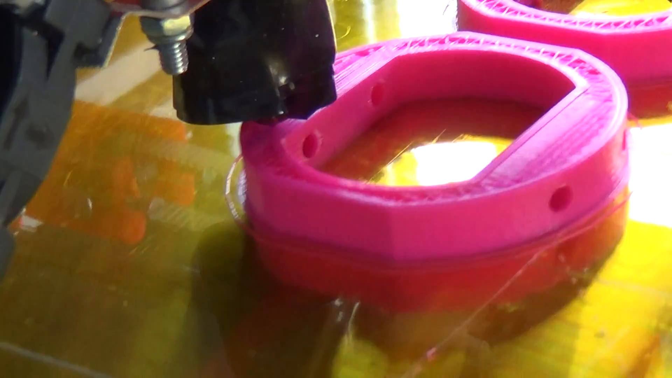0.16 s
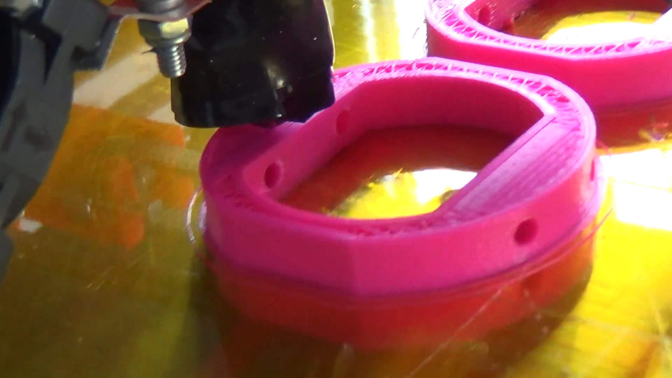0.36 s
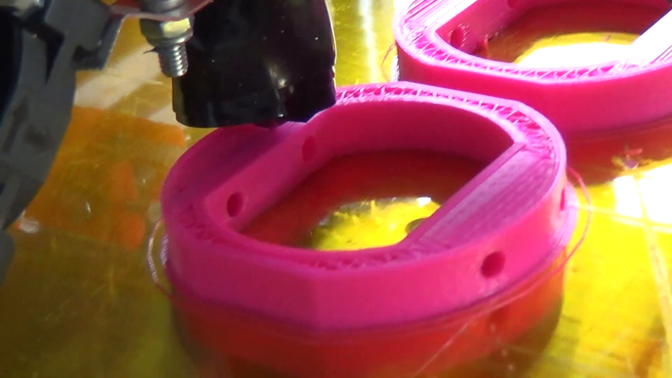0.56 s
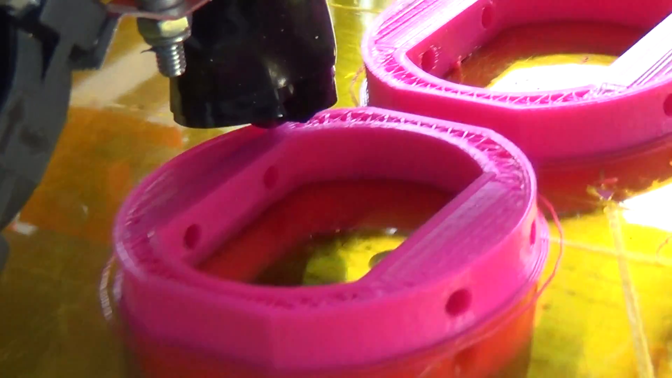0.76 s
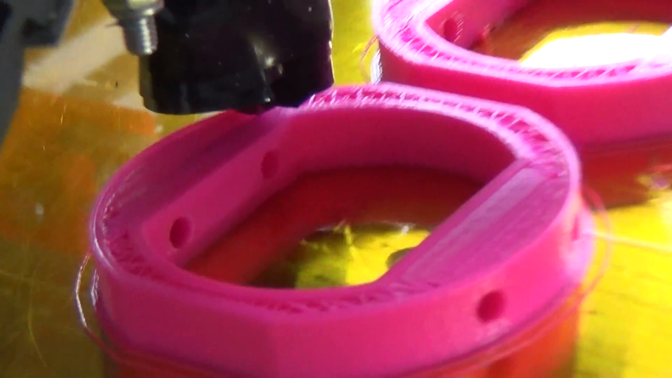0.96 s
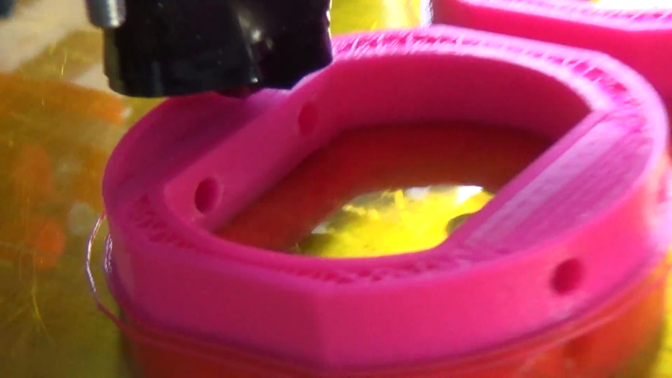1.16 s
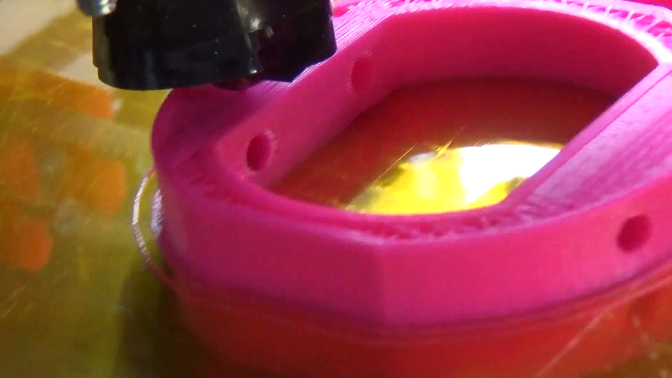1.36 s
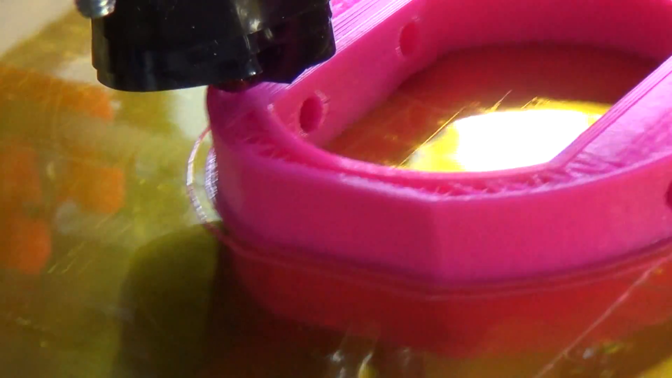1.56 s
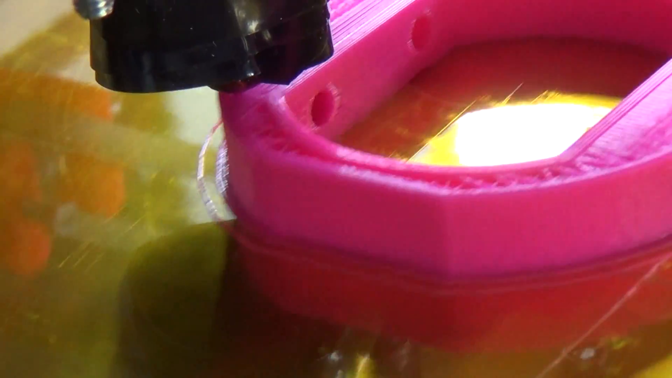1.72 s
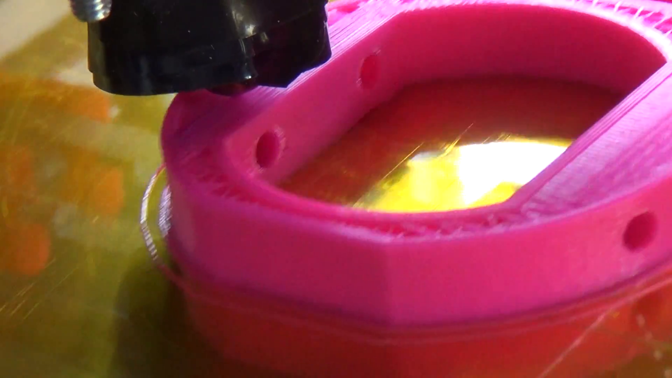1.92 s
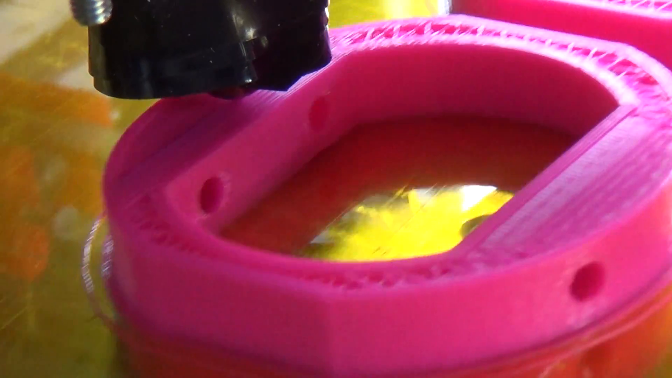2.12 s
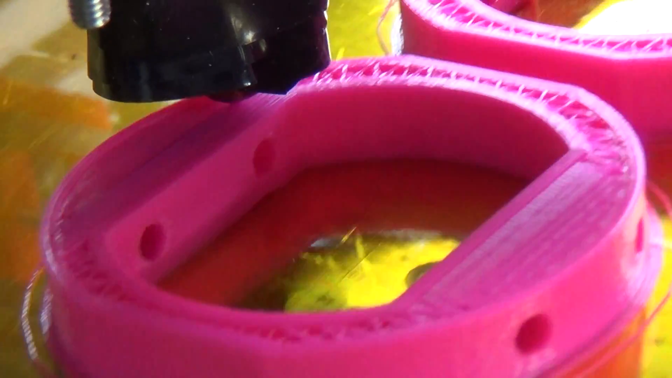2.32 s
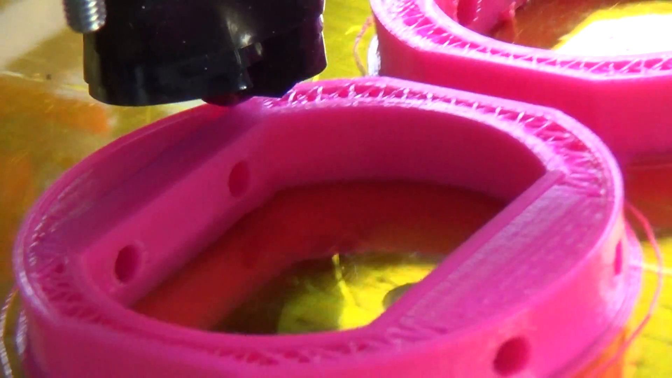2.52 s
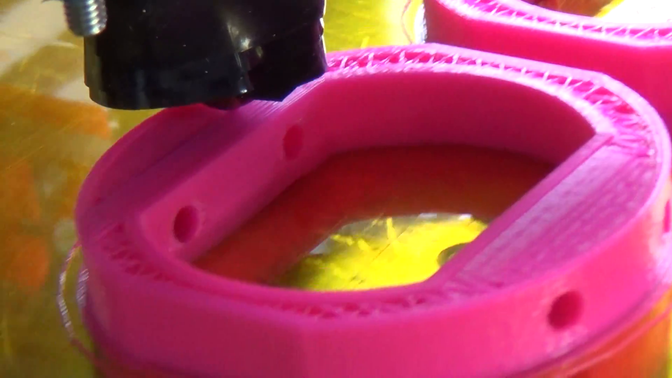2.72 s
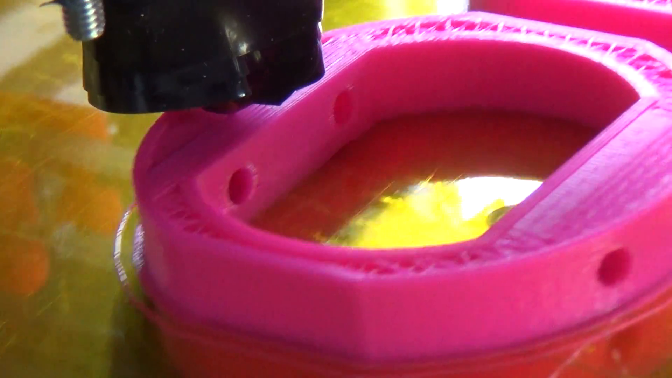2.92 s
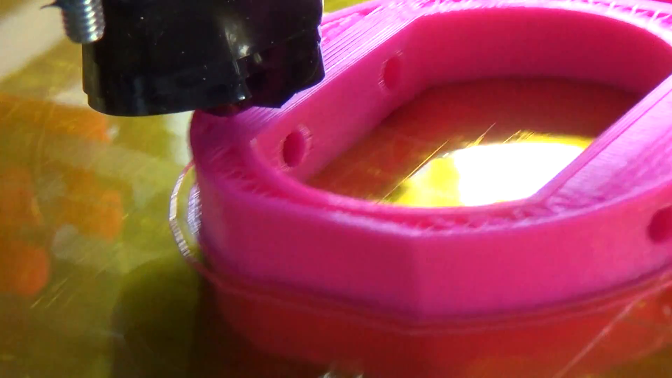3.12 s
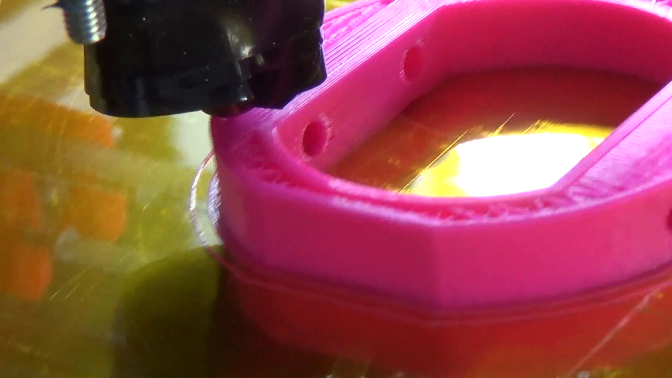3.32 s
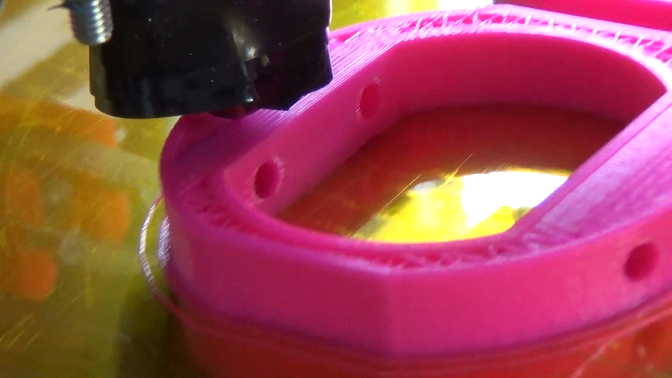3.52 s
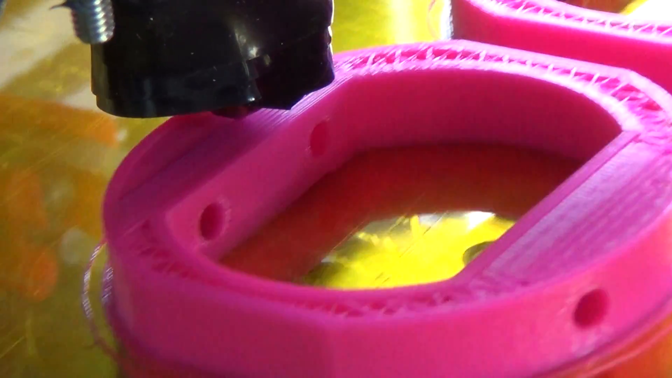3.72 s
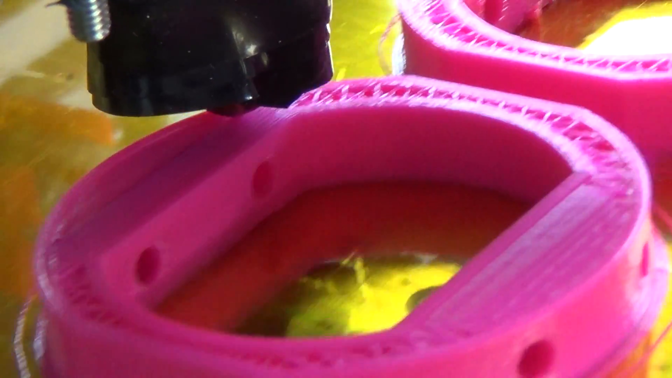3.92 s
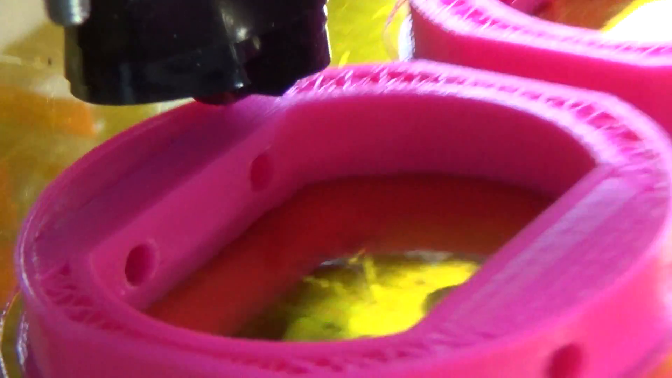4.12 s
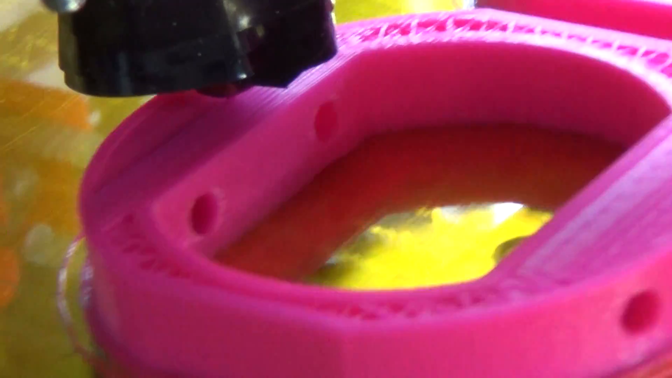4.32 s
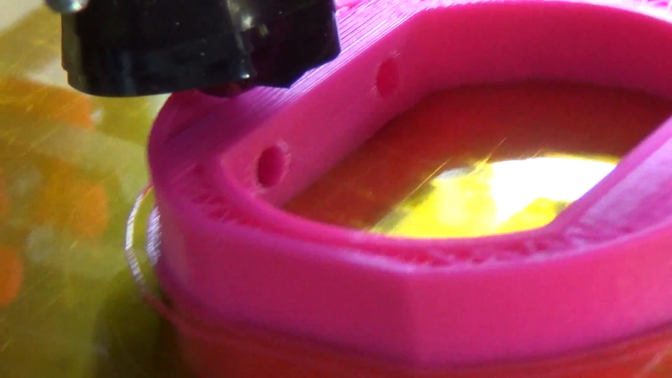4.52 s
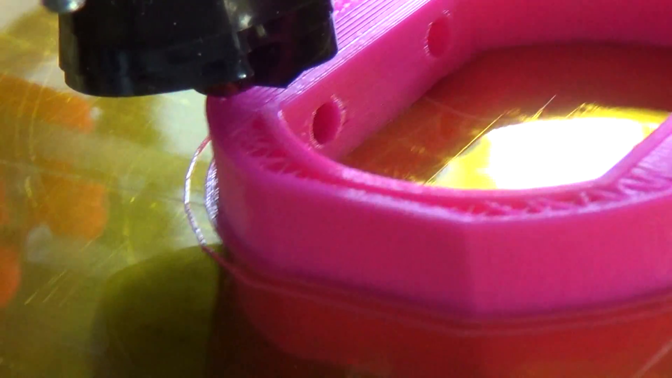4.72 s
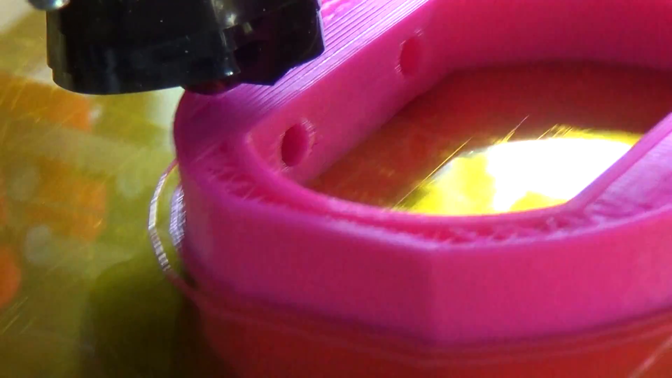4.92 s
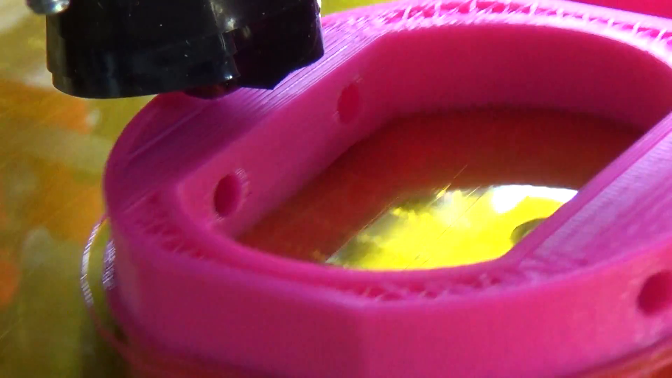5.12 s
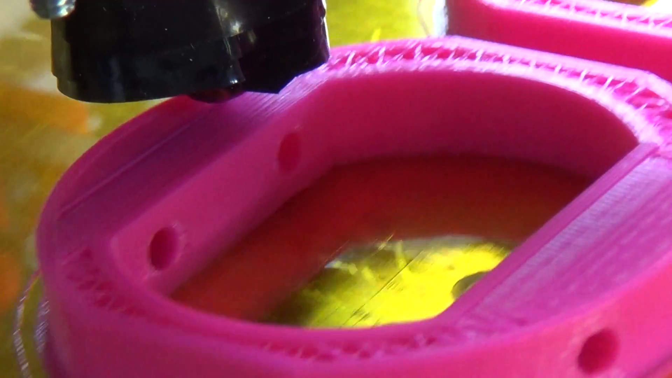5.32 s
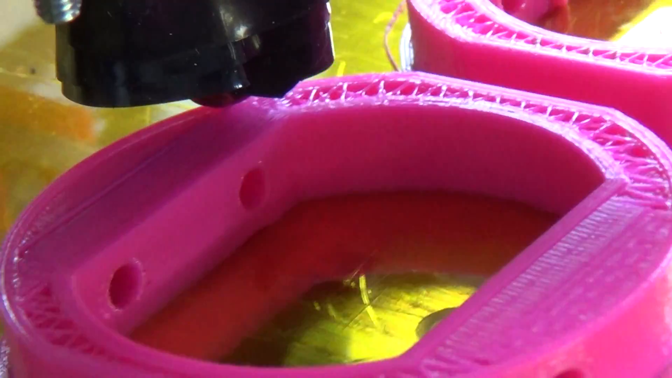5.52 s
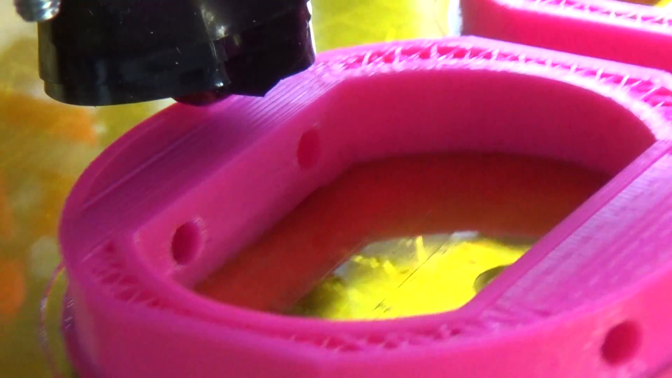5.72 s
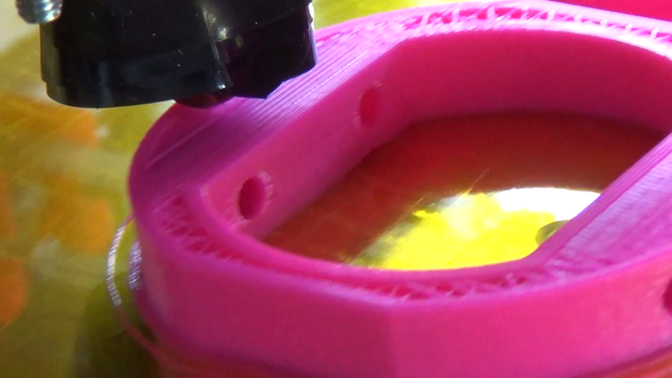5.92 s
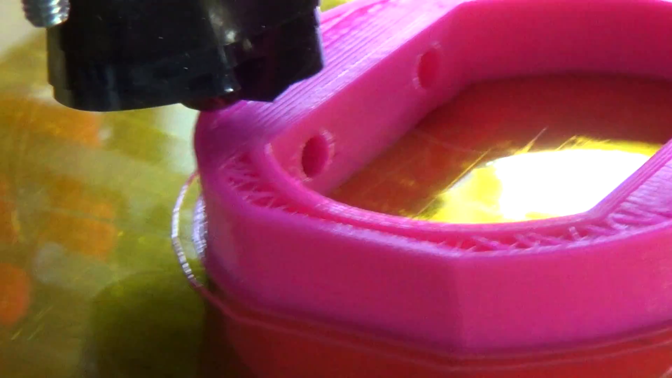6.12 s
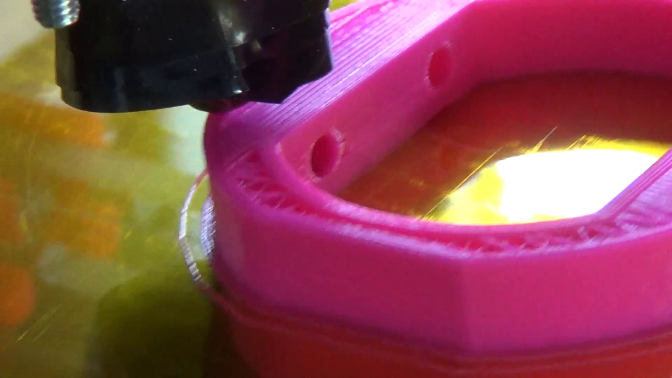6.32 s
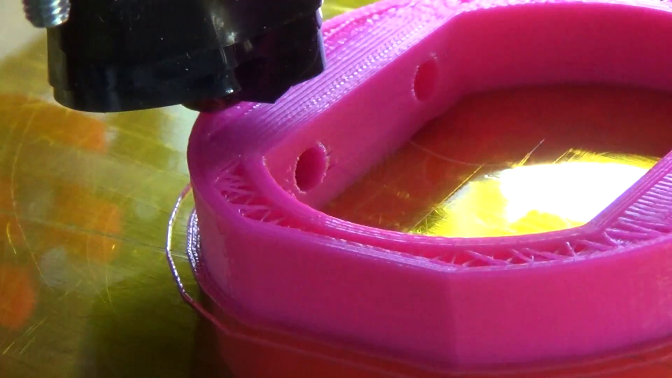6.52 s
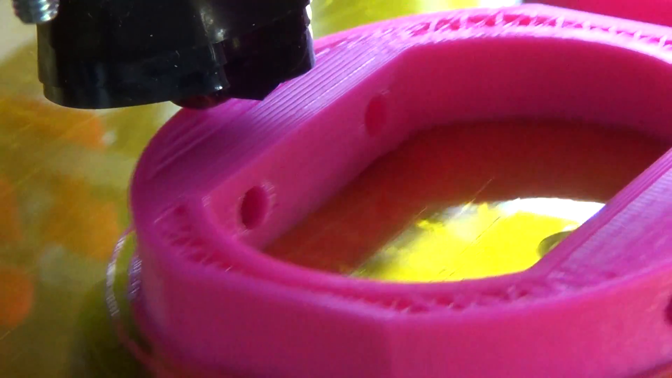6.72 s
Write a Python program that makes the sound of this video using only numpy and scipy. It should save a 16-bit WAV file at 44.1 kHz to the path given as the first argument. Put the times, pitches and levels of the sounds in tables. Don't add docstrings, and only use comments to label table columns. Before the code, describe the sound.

Very close to a desktop 3D printer in a small room. The bed motor holds a clear, high-mid whine for about two thirds of a second, brakes with a rattling shudder and low thump, then whines again at the same pitch. A small fan hisses, hums and ticks rapidly throughout. Occasional plastic snaps and carriage clacks; near the end, short fast jogs make it rougher.

```python
import sys
import numpy as np
from scipy import signal
from scipy.io import wavfile
from scipy.ndimage import uniform_filter1d

SR = 44100
rng = np.random.default_rng(int(sys.argv[2]) if len(sys.argv) > 2 else 0)


def master(y):
    cut = np.clip(np.atleast_2d(y).T, -1, 1)
    pcm = np.round(cut * 32767)
    wavfile.write(sys.argv[1], SR, pcm.astype(np.int16))


def nominal_scale(level):
    x = np.asarray(level, float) / 20
    return 10 ** x


N = 297675


def evened(x):
    return x / np.sqrt(np.mean(x ** 2) + 1e-20)


def read(points, hz):
    f, value = np.transpose(points)
    return np.interp(np.log(hz + 1), np.log(f + 1), value)


def add(mix, s, sound):
    part = mix[..., round(s * SR):][..., :sound.shape[-1]]
    part += sound[..., :part.shape[-1]]


def drift(n, span):
    smooth = uniform_filter1d(rng.standard_normal(n), span)
    return evened(uniform_filter1d(smooth, span))


def ring(x, hz, width):
    return signal.lfilter(*signal.iirpeak(hz, hz / width, SR), x)


def tone(hz, db):
    turns = np.cumsum(hz) / SR + rng.random()
    return np.sqrt(2) * nominal_scale(db) * np.cos(2 * np.pi * turns)


def placed(x, lean_db):
    return x * np.array([nominal_scale(lean_db / 2), nominal_scale(-lean_db / 2)]).reshape(2, -1)


# [start t/s, end t/s, whine level/dB, low hum level/dB, belt tone level/dB]
STROKES = [
    (.125, 0.819, -28.5, -38, -39),
    (.972, 1.642, -28.5, -37, -39.5),
    (1.788, 2.452, -29, -37.5, -40.5),
    (2.599, 3.231, -29, -37.5, -41.5),
    (3.377, 4.007, -29, -37, -43),
    (4.153, 4.743, -29, -37, -44),
    (4.919, 5.476, -30, -41, -43),
    (5.698, 6.14, -29.5, -36.5, -59),
    (6.674, 7.297, -28.5, -38, -58),
]
STEP_HZ = 1456.1
LOUD_ORDERS = (32, 6, 25, 18)
FAINT_ORDERS = (7, 10, 11, 14, 20, 28, 33, 36, 39, 40, 43, 44, 46, 49, 52, 57, 63, 64, 70, 78, 89, 96, 153,
                160, 190, 192, 256)
FAINT_DB = [-57, -56, -55, -56, -57, -59, -55, -51, -58, -55, -58, -58, -57, -60, -62, -60, -61, -61, -63,
            -62, -65, -65, -70, -66, -70, -65, -73]
# [share of the way to the far end, level/dB, left-right/dB]
AWAY = [(0, -0.5, -1), (.07, 1.5, 1), (.2, -2.5, 2), (.46, 1.5, 1), (.7, -2, 2.7), (.88, -8, 4.5),
        (1, -12, 10)]
BACK = [(0, 1, 1.5), (.2, 1, 1), (.36, -0.5, 2.5), (.5, 2, 2), (.79, -5, 4.5), (.92, -3, 5), (1, -6, -6)]
# [t/s, level/dB, width/s]
HICCUPS = [
    (5.128, -11, .015),
    (5.18, -3.5, .08),
]
HUM_LATE_DB, HUM_BUILD_S = -8.5, 0.063
PULLEY_DB, PULLEY_WANDER_DB = -44.5, 2


def stroke(place, start, end, whine_db, hum_db, belt_db):
    t = np.arange(0, end - start, 1 / SR)
    n = len(t)
    way = t / t[-1] if place is AWAY else 1 - t / t[-1]
    share, gain_db, lean_db = np.transpose(place)
    falter_db = sum(db * np.exp(-((start + t - s) / width) ** 2) for s, db, width in HICCUPS)
    loud_db = (whine_db + np.interp(way, share, gain_db) + falter_db,
               hum_db + HUM_LATE_DB * np.exp(-t / HUM_BUILD_S) + 1.0 * drift(n, 2000),
               belt_db + 1.0 * drift(n, 1500),
               PULLEY_DB + 0.19 * (belt_db - STROKES[2][-1]) + PULLEY_WANDER_DB * drift(n, 2000))
    base = STEP_HZ / 32 * np.ones(n)
    whine, hum, belt, pulley = (tone(k * base, db + 0.16 * drift(n, 300))
                                for k, db in zip(LOUD_ORDERS, loud_db))
    faint = sum(tone(k * base, db + 1.5 * drift(n, 1500)) for k, db in zip(FAINT_ORDERS, FAINT_DB))
    sound = placed(whine, np.interp(way, share, lean_db))
    sound = sound + placed(belt + pulley + faint, 0.14) + placed(hum, 2.5)
    fade = np.minimum(1, np.minimum(t, t[-1] - t) / .005)
    return start, sound * fade


# [t/s, step rate f/Hz]
JOGS = [(5.47, 1456), (5.54, 380), (5.545, 300), (5.615, 1292), (5.69, 1292), (5.7, 1456), (6.138, 1456),
        (6.205, 215), (6.22, 200), (6.243, 300), (6.272, 4064), (6.306, 4064), (6.335, 300), (6.39, 550),
        (6.456, 200), (6.496, 4064), (6.53, 4064), (6.572, 200), (6.655, 1456)]
BRAKE_S, REST_HZ = .062, 380
DWELL_S, CRAWL_HZ, SETTLE_S = .008, 300, .003


def speed(t):
    ends = [-.025] + [row[1] for row in STROKES[:6]]
    starts = [row[0] for row in STROKES[:7]]
    points = []
    for end, start in zip(ends, starts):
        slow = end + BRAKE_S
        points += [(end, STEP_HZ), (slow, REST_HZ), (slow + DWELL_S, CRAWL_HZ), (start - SETTLE_S, STEP_HZ)]
    return np.interp(t, *np.transpose(points + JOGS))


# [t/s, hold/s, thump level/dB, middle shudder level/dB]
KNOCKS = [(0, .005, -31.5, -52), (0.052, 0.025, -32.5, -35.5), (0.892, 0.016, -31.5, -32.5),
          (1.712, 0.032, -35, -34.5), (2.522, 0.035, -30.5, -34.5), (3.312, 0.022, -31.5, -34.5),
          (4.073, 0.031, -33.5, -33), (4.82, .006, -35, -35), (4.847, 0.037, -27, -34.5),
          (5.552, .02, -33, -33.5), (5.573, 0.089, -31.5, -35), (6.16, .05, -36, -34),
          (6.214, 0.0051, -28, -32), (6.336, 0.077, -39.5, -31), (6.449, 0.012, -30, -39),
          (6.59, 0.0078, -30, -38), (6.608, 0.058, -35, -37)]


def knocks(t, column, rest_db, rise, fall):
    s, hold, peak_db = (np.transpose(KNOCKS)[k][:, None] for k in (0, 1, column))
    before, after = np.maximum(s - t, 0), np.maximum(t - s - hold, 0)
    return np.maximum(rest_db, (peak_db - rise * before - fall * after).max(0))


# [start t/s, end t/s, high shudder level/dB, rattle relative to the steps]
SHUDDERS = [(0, 0.132, -36, 3), (.805, 0.974, -34, 3), (1.635, 1.792, -35.5, 2.4), (2.435, 2.601, -35, 3.6),
            (3.224, 3.374, -36.5, 2.7), (3.999, 4.16, -34, 3), (4.735, 4.831, -35.5, 1.6),
            (4.825, 4.952, -36, 6.4), (5.465, 5.554, -33.5, 4), (5.545, 5.709, -35, 6.3),
            (6.136, 6.264, -35.5, 7.3), (6.249, 6.33, -59, 2.4), (6.3326, 6.47, -36, 9.4),
            (6.475, 6.583, -61, 2.3), (6.571, 6.691, -34.5, 5)]
# [f/Hz, width/Hz, level/dB]
FRAME = [(147.4, 5.4, -16), (212.6, 34.5, -5), (343, 44, -3), (448, 45, -1), (554.5, 17.3, 7.5),
         (791, 120, 3.5), (1044, 103, 7), (1398, 230, 5), (1570, 70, 6), (1916, 72, 6), (2190, 40, -15),
         (2700, 250, -8.5), (3170, 340, -11)]
SPLIT_HZ = (0, 300, 680, 5000)
# [level between knocks/dB, rise/dB per s, fall/dB per s]
THUMP = (-43.5, 460, 790)
MIDDLE = (-54, 460, 210)
STEP_ORDERS = (25 / 32, 1, 57 / 32, 2, 3, 4, 5, 6, 8, 10)
STEP_DB = [-12, 0, -7, -4, -8, -9, -10, -11, -12, -13]
STEP_TOP_HZ = 2300
STAIR_S = .0085
JOLT_DB, JOLT_S = 3, 0.0092
LOOSE_BRAKING, LOOSE_CLIMBING = .36, .56
MIDDLE_LATE_S, BRAKING_DB = 0.012, 0.5


def shudder(start, end, high_db, slack):
    t = np.arange(start, end, 1 / SR)
    n = len(t)
    ramp = np.gradient(speed(t))
    since = t - np.transpose(KNOCKS)[0][:, None]
    jolt = (np.exp(-abs(since) / JOLT_S) * (since > 0)).max(0)
    braking = uniform_filter1d(1. * (ramp < 0), size=400)
    levels_db = (knocks(t, 2, *THUMP),
                 knocks(t - MIDDLE_LATE_S, 3, *MIDDLE),
                 high_db + JOLT_DB * jolt + BRAKING_DB * braking)

    hz = speed((t // STAIR_S + .5) * STAIR_S)
    turns = np.cumsum(hz * (1 + 0.01476 * drift(n, 60))) / SR
    steps = sum(nominal_scale(db) * np.cos(2 * np.pi * k * turns) / (1 + (k * hz / STEP_TOP_HZ) ** 10)
                for k, db in zip(STEP_ORDERS, STEP_DB))
    steps *= nominal_scale(2.0 * drift(n, 150))
    steps *= uniform_filter1d(1. * (ramp != 0), size=200)

    rattle = rng.standard_normal(n) * nominal_scale(3.0 * drift(n, 70))
    rattle *= .4 + np.exp(-(turns % 1) / .3)
    loose = slack * np.where(ramp < 0, LOOSE_BRAKING, LOOSE_CLIMBING)
    drive = evened(steps) + loose * evened(rattle)
    drive = signal.sosfilt(signal.butter(4, (125, 3700), "band", fs=SR, output="sos"), drive)

    out = np.zeros(n)
    for level_db, lo, hi in zip(levels_db, SPLIT_HZ, SPLIT_HZ[1:]):
        body = sum(nominal_scale(db) * ring(drive, f, w) for f, w, db in FRAME if lo < f < hi)
        loudness = np.sqrt(uniform_filter1d(body ** 2, size=1500) + 1e-9)
        out += nominal_scale(level_db) * body / loudness
    return start, placed(out * signal.windows.tukey(n, 0.011 / (end - start)), 0.13)


# [start t/s, end t/s]
SWEEPS = [
    (6.243, 6.274),
    (6.458, 6.498),
    (6.528, 6.572),
]
JOG_DB = -46


def sweep(start, end):
    t = np.arange(start, end, 1 / SR)
    glide = tone(speed(t), JOG_DB + 2.2 * drift(len(t), 100))
    return start, placed(glide * signal.windows.tukey(len(t), .3), .4)


# [t/s, peak level/dB, bright ring f/Hz]
CLACKS = [
    (.912, -27, 7000),
    (1.722, -24.5, 3340),
    (2.527, -30, 3380),
    (3.32, -34, 3300),
    (4.091, -28, 3000),
    (6.26, -25, 6800),
    (6.335, -20.5, 6500),
]


def clack(s, db, hz):
    t = np.arange(1300) / SR
    blow = rng.standard_normal(len(t)) * nominal_scale(-60 * t / 0.053)
    bright = evened(ring(ring(blow, hz, 700), hz, 900))
    x = evened(ring(blow, 1000, 850)) + nominal_scale(-7 - 60 * t / 0.038) * bright
    return s, placed(nominal_scale(db) * x / abs(x).max(), .6)


# [start t/s, end t/s, tones as (f/Hz,
# level/dB)]
MOVES = [(4.93, 5.52, [(52, -63), (155, -50.5), (206, -40.5), (256.8, -41.5), (316, -50.5), (105, -59),
         (359, -54), (453, -53.5), (515, -57), (570, -46), (1350, -49), (1550, -48)]),
         (5.573, 5.815, [(132, -51.5)]), (4.888, 4.935, [(565, -33.5)]), (6.625, 6.68, [(345, -38),
         (447, -37.5), (705, -41)]), (6.304, 6.325, [(506, -37)]), (6.167, 6.181, [(1095, -31),
         (1600, -37)]), (6.388, 6.402, [(1620, -33), (1100, -39)]), (6.426, 6.456, [(560, -33)]),
         (6.153, 6.181, [(555, -37)]), (6.187, 6.2, [(410, -35)]), (6.405, 6.436, [(1620, -41)]),
         (6.312, 6.33, [(2850, -43), (500, -44)]), (5.618, 5.664, [(1292, -28.5)]),
         (5.664, 5.695, [(1306, -35)]), (5.622, 5.682, [(1927, -54), (2056, -48), (2650, -48),
         (3252, -44.5)]), (6.272, 6.305, [(506.0, -37.5), (1523, -56), (2051, -63), (3558, -47),
         (4064, -41), (6449, -62), (8134, -49)]), (6.496, 6.53, [(511.4, -47), (1109, -57), (1529, -53),
         (2536, -53), (3052, -61), (3558, -55), (4064, -41), (8134, -49)])]


def move(start, end, tones):
    n = round((end - start) * SR)
    sound = sum(tone(hz * np.ones(n), db + 1.0 * drift(n, 400)) for hz, db in tones)
    fade = np.minimum(1, np.minimum(np.arange(n), n - np.arange(n)) / 160)
    return start, placed(sound * fade, 3.1)


# [t/s, peak level/dB, left-right/dB, brightness/dB per octave]
SNAPS = [(0.7856, -36, 0.0, -3), (0.991, -23.5, 2, -1.5), (1.0221, -36, 0.0, 2), (1.0953, -24, 2, -2),
         (1.406, -30, 1.1, -8), (1.51, -28, 2, -8), (3.352, -27.5, 0.4, .1), (4.1976, -28, 2, -1),
         (4.9228, -23, 1.5, .1), (5.162, -31, 0.4, -4), (5.606, -18.5, 2, -1), (5.636, -23, 2, -1),
         (5.7092, -23, 2, -1.5), (6.1688, -23.5, 2, -2), (6.271, -30.5, -1.1, -6), (6.3044, -36, 0.0, .1),
         (6.32, -36, 1.1, .1), (6.526, -32, 1.1, -1), (6.5858, -38, 0.0, .1), (6.614, -28, 3, -2)]
# [f/Hz, level/dB, time to fall 60 dB/s]
SNAP_MODES = [(4320, 3, 0.0096), (5260, 2.5, 0.0073), (6180, 4, 0.0046), (7500, 1.5, 0.0043),
              (9080, -5, 0.0036), (10500, 1, 0.003)]


def snap(s, db, lean_db, tilt_db):
    t = np.arange(1200) / SR
    x = np.zeros(len(t))
    for f, mode_db, t60 in SNAP_MODES:
        more_db, detune = rng.uniform(-1, 1, 2) * (2.0, .012)
        level_db = mode_db + more_db + tilt_db * np.log2(f / 5e3) - 60 * t / t60
        rise = (1 - np.exp(-t / 0.00056 * (f / 4400) ** 2)) ** 2
        x += nominal_scale(level_db) * np.sin(2 * np.pi * f * (1 + detune) * t) * rise
    puff = ring(ring(rng.standard_normal(len(t)), 6000, 4300), 6700, 6000)
    x += puff * nominal_scale(8 + tilt_db - 60 * t / 0.0043) * (1 - np.exp(-t / .00008))
    return s + .0015, placed(nominal_scale(db + 5.5) * x / abs(x).max(), lean_db)


# [f/Hz, level/dB, waver/Hz]
HUMS = [(80, -61.5, 1.5), (545, -51, 0.3), (1085.6, -47, 1)]
# [t/s, f/Hz, level/dB]
SECOND_FAN = [(0, 1092, -53), (4.5, 1094, -53), (5, 1098, -47), (6.75, 1104, -46)]
# [f/Hz, level/dB]
WHISTLE = (15625, -68)
# [t/s, peak level/dB]
HARD_TICKS = [(0.0237, -31), (0.1859, -29), (0.335, -29), (0.468, -25.5), (0.6309, -31), (0.9115, -26),
              (0.9719, -33), (1.0012, -23.5), (1.061, -32), (1.222, -30), (1.2529, -32), (1.3108, -31),
              (1.326, -26), (1.4455, -31), (1.4604, -32), (1.49, -30), (1.5183, -30), (1.8007, -32),
              (1.9045, -32), (2.098, -26), (2.2771, -34), (2.321, -31), (2.4103, -28), (2.4702, -32),
              (2.617, -34), (2.6332, -27), (2.7207, -28), (2.7675, -32), (2.8408, -30), (2.8718, -32),
              (2.9755, -35), (2.9905, -25.5), (3.1232, -32), (3.198, -32), (3.227, -32), (3.3163, -31),
              (3.7622, -32), (3.8356, -30), (4.029, -26), (4.118, -30), (4.2367, -31), (4.325, -27.5),
              (4.3995, -25.5), (4.4587, -30), (4.7103, -29), (4.874, -26), (4.9446, -29), (5.1406, -31),
              (5.3332, -32), (5.377, -28), (5.467, -26), (5.6032, -30), (5.6286, -28), (5.823, -30),
              (5.986, -28), (6.3115, -27), (6.5339, -28.5), (6.6227, -30)]
FAN_HZ, TICK_DB = 67.55, -36


def fan():
    tones = sum(tone(hz + waver * drift(N, 4000), db + 2.6 * drift(N, 2000)) for hz, db, waver in HUMS)
    s, hz, db = np.transpose(SECOND_FAN)
    t = np.arange(N) / SR
    tones += tone(np.interp(t, s, hz) + 1.007 * drift(N, 4000), np.interp(t, s, db))
    tones += tone(WHISTLE[0] * np.ones(N), WHISTLE[1])

    count = int(N / SR * FAN_HZ * 2) - 2
    late, strength = rng.standard_normal((2, count))
    at = (np.arange(count) / 2 + .72) / FAN_HZ + .0007 * late
    db = TICK_DB + 4.0 * np.minimum(strength, .9) - 10.0 * (np.arange(count) % 2)
    hard_at, hard_db = np.transpose(HARD_TICKS)
    at, db = np.r_[at, hard_at + .0006], np.r_[db, hard_db + 1.5]

    ticks, u = np.zeros(N), np.arange(260) / SR
    edge = np.sin(2 * np.pi * 12600 * u) * np.exp(-u / 0.00026)
    for s, level_db, (a, b) in zip(at, db, rng.random((len(at), 2))):
        rise = .00018 + .0002 * a
        chirp = np.sin(2 * np.pi * (9200 + 700 * b + 240000.0 * u) * u)
        add(ticks, s + .0005, nominal_scale(level_db - 11) * edge)
        add(ticks, s + .0005, nominal_scale(level_db) * chirp * (u / rise) * np.exp(1 - u / rise))
    ticks += nominal_scale(-11) * np.roll(ticks, shift=100)
    return placed(tones + ticks, 0.45)


# [f/Hz, level/dB per Hz]
AIR = [(25, -30), (60, -5), (120, -12), (200, -2.5), (310, -3), (400, -8), (700, -0.5), (1100, -0.5),
       (2000, -2.5), (2500, -9.5), (4800, -17), (8000, -15), (12500, -18.5), (15700, -26)]
AIR_DB = -36.5
# [f/Hz, width/Hz, level/dB]
AIR_PEAKS = [(248, 97, 10.5), (460, 54, 8.5), (1492, 43, 10), (2859, 46, 14.5), (3780, 32, 5.5),
             (3950, 1350, 6), (9900, 540, 3)]
# [f/Hz, likeness]
SAME = [(60, 0.52), (130, 0.99), (290, 0.9), (640, 0.46), (1410, 0.68), (3100, 0.79), (6820, 0.94),
        (15000, 0.95)]
# [f/Hz, left-right/dB]
LEAN = [(60, 2.5), (180, 2.5), (550, 0.0), (1650, 0.5), (4970, 0.0), (15000, 0.0)]


def air():
    frames, hz = N // 256 + 5, np.fft.rfftfreq(1024, 1 / SR)
    a, b, c, d, patches = rng.standard_normal((frames, 513, 5)).T
    patches = uniform_filter1d(patches, size=12, axis=0)
    patches = evened(uniform_filter1d(patches, size=10, axis=1))
    colour_db = read(AIR, hz) + sum(db / (1 + (2 * (hz - f) / w) ** 2) for f, w, db in AIR_PEAKS)
    same = np.clip(read(SAME, hz), -1, 1)[:, None]
    left, other = a + 1j * b, c + 1j * d
    z = np.array([left, same * left + np.sqrt(1 - same ** 2) * other])
    lean_db = read(LEAN, hz)[:, None] * np.array([.5, -.5])[:, None, None]
    z *= nominal_scale(colour_db[:, None] + 1.23 * patches + lean_db)
    hiss = signal.istft(z, nperseg=1024, noverlap=768)[1][:, :N]
    return nominal_scale(AIR_DB) * evened(hiss)


def room(x):
    taps = np.zeros((2, 9000))
    slots = np.arange(90, 8900, 30)
    at = slots + rng.integers(0, 30, (2, len(slots)))
    echoes = rng.choice([-1., 1.], at.shape) * nominal_scale(-60 * at / SR / 0.16)
    np.put_along_axis(taps, at, echoes, axis=1)
    return signal.oaconvolve(x, taps / np.linalg.norm(taps[0]), axes=1)[:, :N]


def scene():
    steady, sudden = np.zeros((2, 2, N))
    for place, row in zip((AWAY, BACK) * len(STROKES), STROKES):
        add(steady, *stroke(place, *row))
    for mix, source, table in ((sudden, shudder, SHUDDERS), (sudden, sweep, SWEEPS), (sudden, clack, CLACKS),
                               (steady, move, MOVES), (steady, snap, SNAPS)):
        for row in table:
            add(mix, *source(*row))
    echoes = room(nominal_scale(-25) * steady + nominal_scale(-6.5) * sudden)
    return steady + sudden + echoes + fan() + air()


def roll_off(x):
    return signal.sosfilt(signal.butter(12, 15740, fs=SR, output="sos"), x)


def record(dry):
    edge = signal.firwin(601, 15700, window=("kaiser", 9), fs=SR)
    mix = signal.oaconvolve(dry, edge[None], "same")
    return roll_off(mix)


dry = scene()
out = record(dry)
master(out)
```